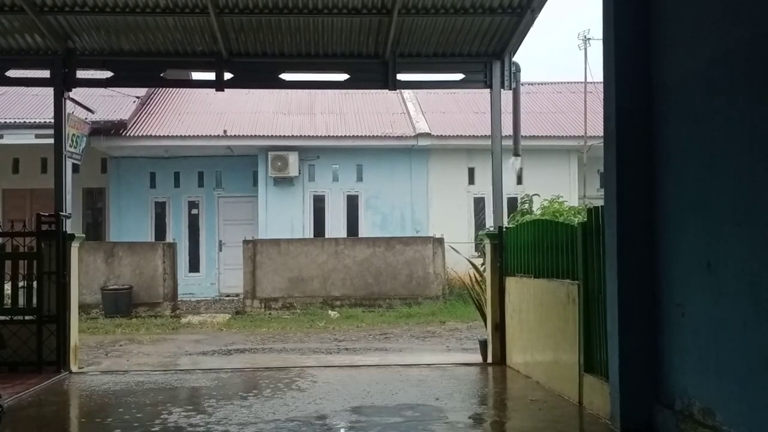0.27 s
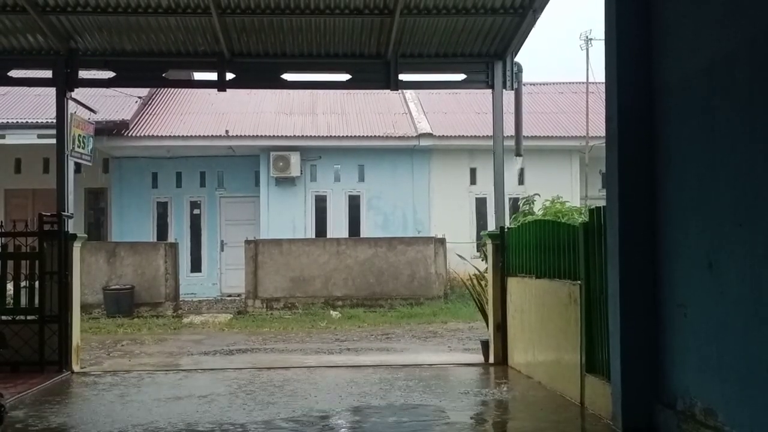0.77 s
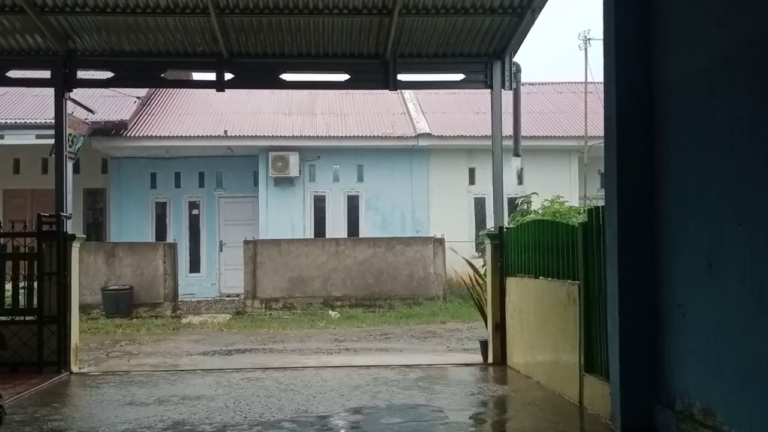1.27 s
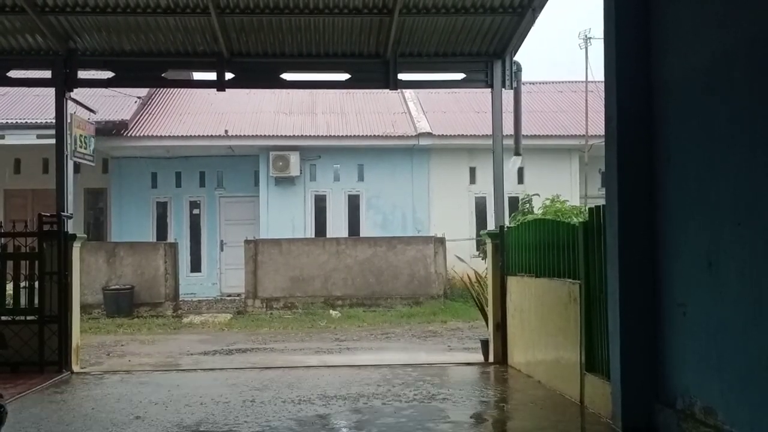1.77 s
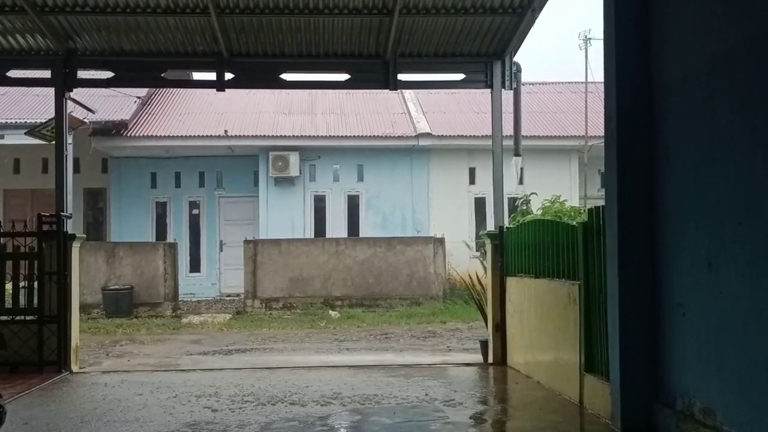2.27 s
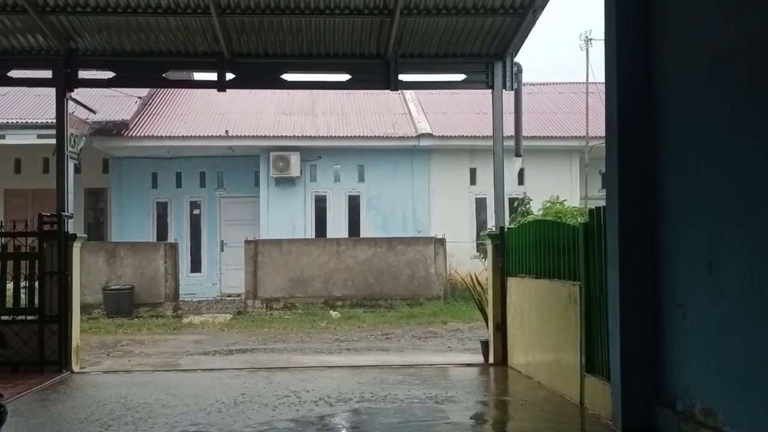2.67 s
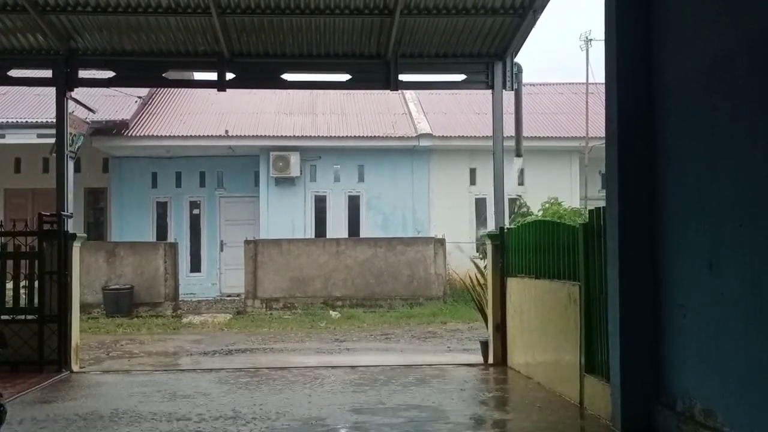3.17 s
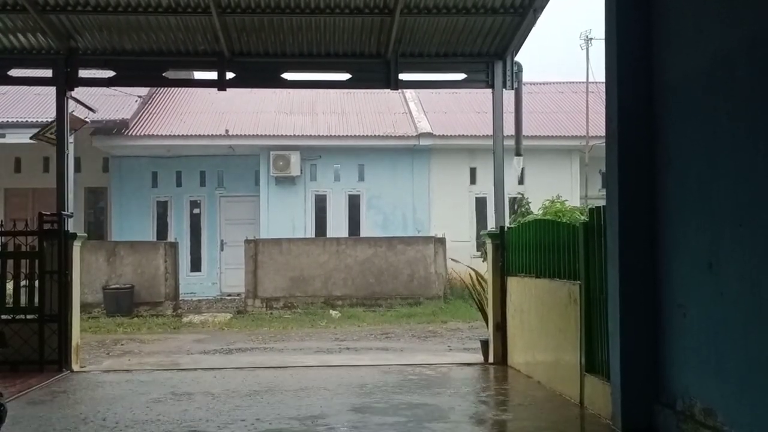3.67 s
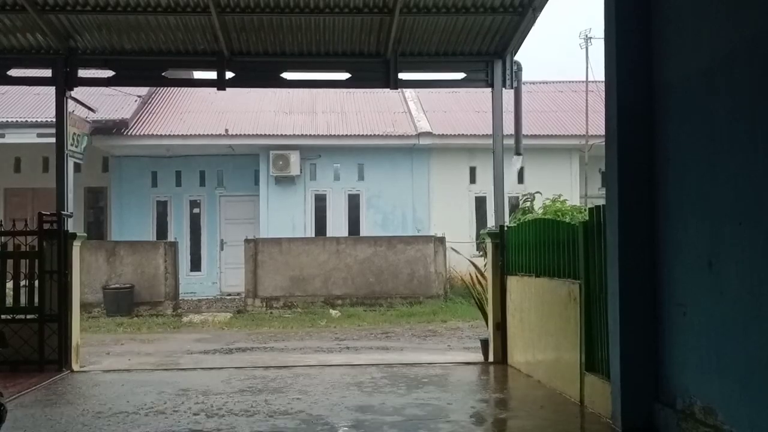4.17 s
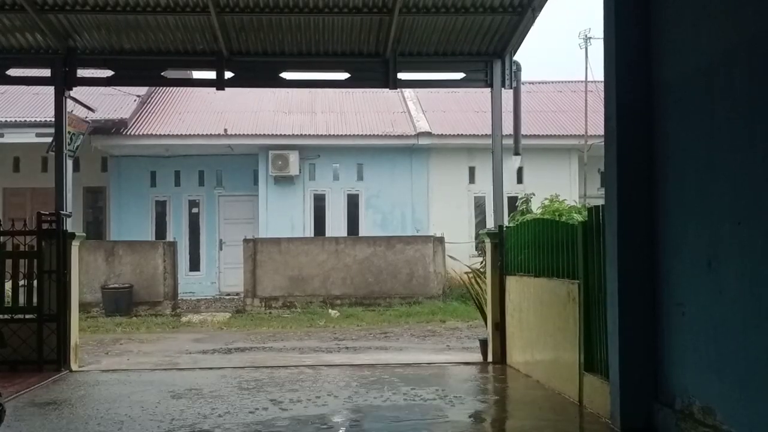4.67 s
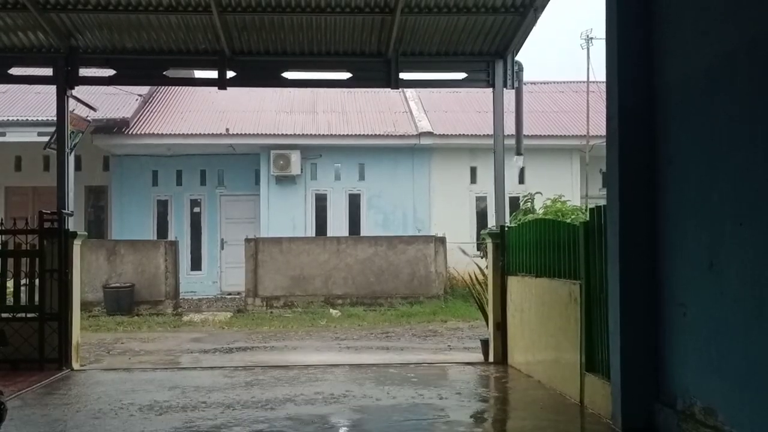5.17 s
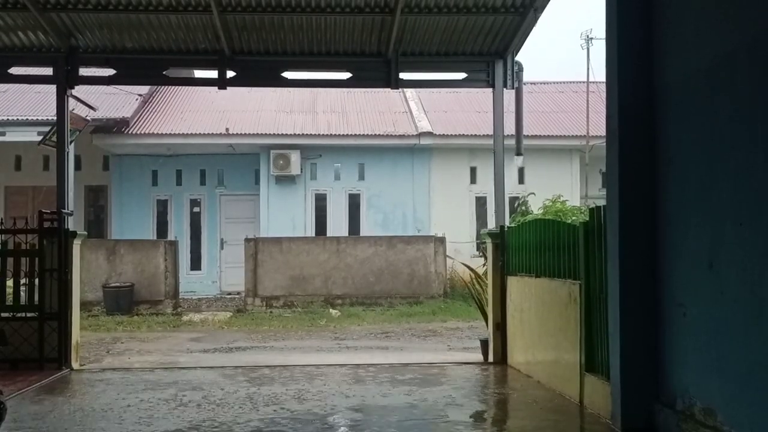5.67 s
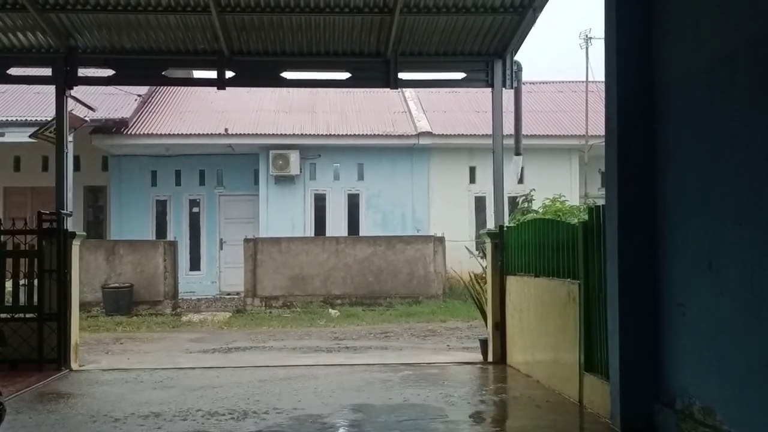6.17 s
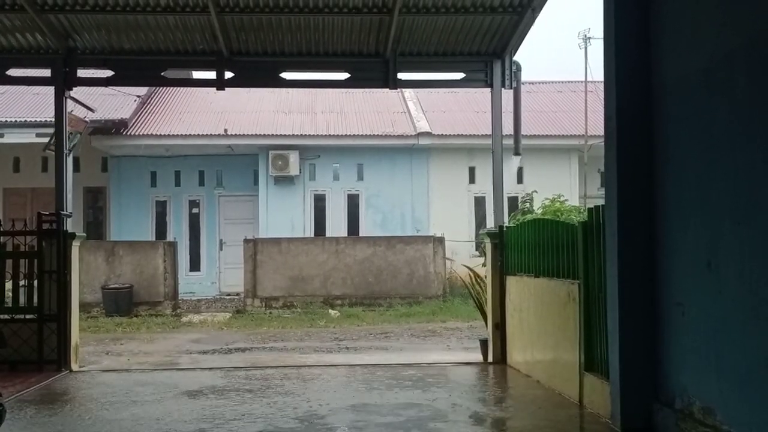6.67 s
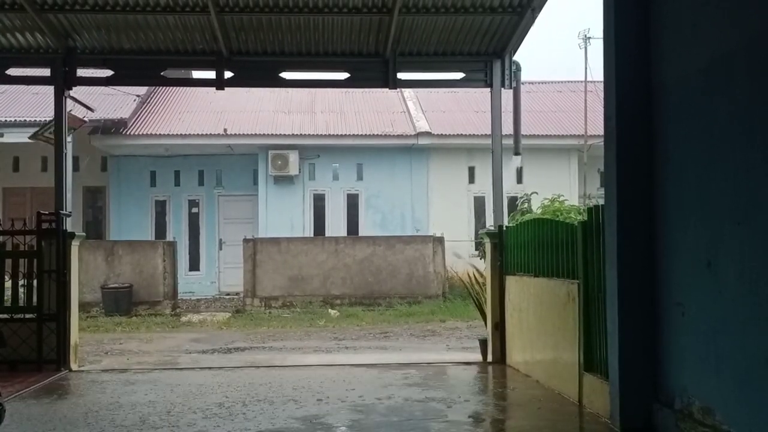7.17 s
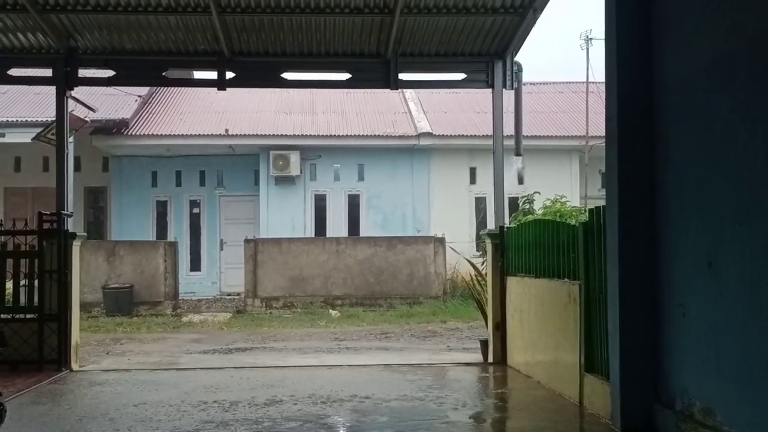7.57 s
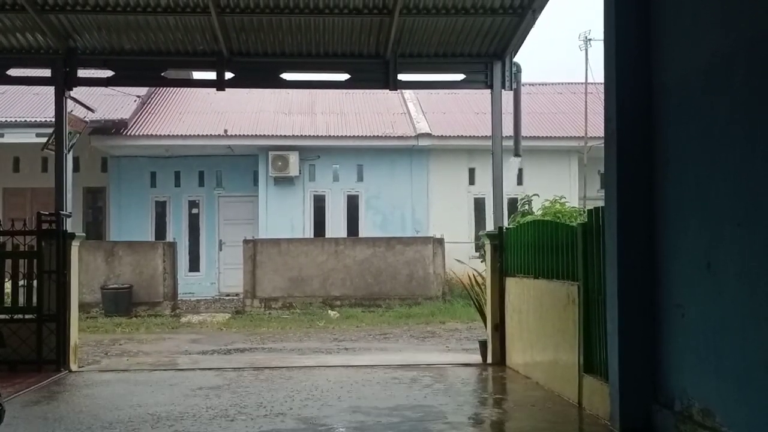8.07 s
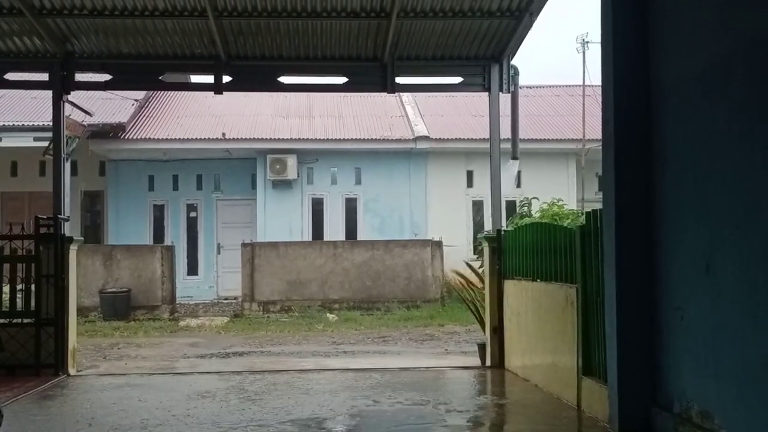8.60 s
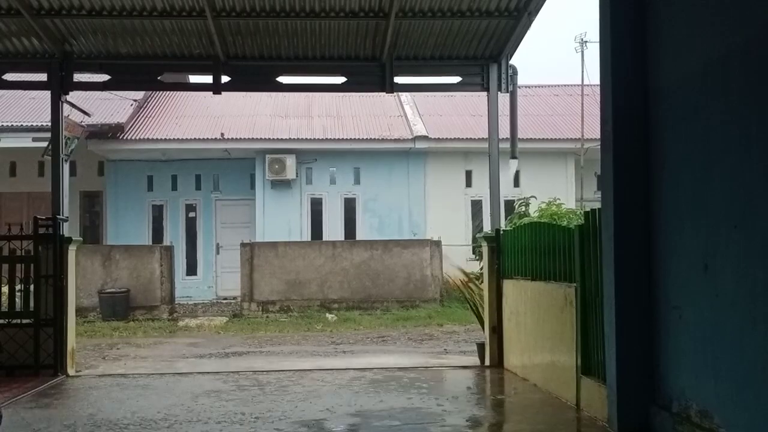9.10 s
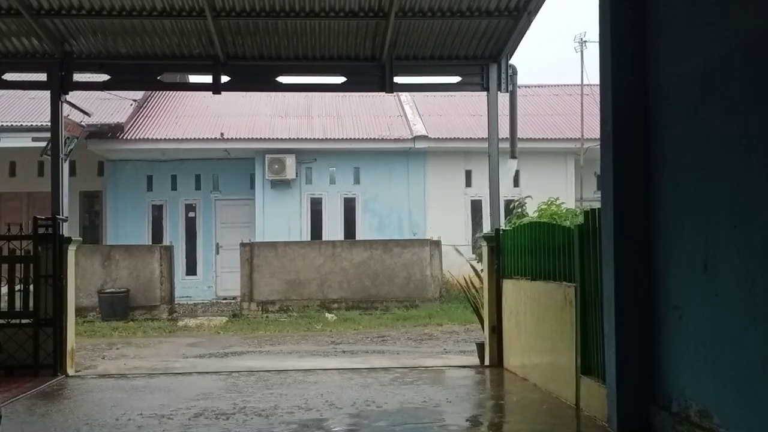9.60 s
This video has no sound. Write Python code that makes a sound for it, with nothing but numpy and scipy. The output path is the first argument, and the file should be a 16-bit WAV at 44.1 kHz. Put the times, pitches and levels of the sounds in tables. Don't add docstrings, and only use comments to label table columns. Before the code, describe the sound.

From beneath a metal canopy, tens of thousands of drops merge into one wide-band rush. Heavy drops boom and drum at first, then the rain turns finer and thinner before filling out at the end. It swells and sags with gusts and never stops. The small microphone sounds nearly mono and resonant around three kilohertz, with crisp splash hiss above.

```python
import sys
import numpy as np
from scipy import signal
from scipy.fft import rfft, irfft, next_fast_len
from scipy.io import wavfile
from scipy.ndimage import uniform_filter1d

SR = 44100
rng = np.random.default_rng(int(sys.argv[2]) if len(sys.argv) > 2 else 0)


def bounce(signal):
    frames = np.transpose(np.atleast_2d(signal))
    limited = np.clip(frames, -1, 1)
    pcm = np.round(limited * 32767).astype(np.int16)
    wavfile.write(sys.argv[1], SR, pcm)


def voltage_ratio(decibels):
    exponent = np.asarray(decibels, float) / 20
    return 10 ** exponent


N = 433944
SECONDS = np.arange(N) / SR
BOOM_TOP_HZ, DRUM_TOP_HZ, SPRAY_FOOT_HZ = 560, 1500, 4900
BLOCK, FIRST_BLOCK, TOP_HZ = 1024, 608, 15750


def rms_one(x):
    return x / np.sqrt(np.mean(x ** 2) + 1e-20)


def in_time(rows):
    s, value = np.transpose(rows)
    return np.interp(SECONDS, s, value)


def drift(rate):
    r = np.exp(-80 * np.pi * rate / SR)
    noise = rng.standard_normal(N // 40 + 2002)
    slow = signal.lfilter([1], [1, -2 * r, r * r], noise)[2000:]
    return np.interp(np.arange(N) / 40, np.arange(len(slow)), rms_one(slow))


def colour(x, points, low_hz, high_hz):
    size = next_fast_len(N)
    hz = np.maximum(np.arange(size // 2 + 1) * SR / size, 1)
    point_hz, point_db = np.transpose(points)
    fade = 1 / np.sqrt((1 + (low_hz / hz) ** 12) * (1 + (hz / high_hz) ** 12))
    gain = voltage_ratio(np.interp(np.log(hz), np.log(point_hz), point_db)) * fade
    return rms_one(irfft(rfft(x, size) * gain, size)[:N])


# time in seconds, strength of the patter in dB.
GUST_STRENGTH = [(0, -21.5), (.43, -23), (.58, -19), (.8, -19.5), (1.05, -22.5), (1.65, -20), (2.78, -23),
                 (3.0, -20), (3.45, -19), (4.2, -22.5), (4.4, -20.5), (4.9, -22.5), (5.13, -24.5),
                 (5.72, -16.5), (6.85, -22), (8.65, -24), (9.5, -22), (9.84, -22)]
# centre in seconds, rise in dB.
WIND_PUFFS = [
    (1.22, 0),
    (3.33, 0.5),
    (4.78, 1),
    (6.47, 0.5),
    (7.2, 0.6),
    (8.15, 1.8),
    (8.92, 2),
]


def gusts():
    half_length_s = 0.15
    level_db = in_time(GUST_STRENGTH)
    for s, rise_db in WIND_PUFFS:
        level_db = level_db + rise_db * np.exp(-((SECONDS - s) / half_length_s) ** 2)
    return level_db


# time in seconds, weight in dB.
DROP_WEIGHT = [
    (0, 3),
    (1.3, 1.5),
    (2.6, 0.5),
    (4, .4),
    (5.2, .8),
    (6.4, -0.8),
    (8.2, -2),
    (9.1, -0.4),
    (9.84, 1.6),
]


def drop_weight():
    return in_time(DROP_WEIGHT)


def drops(per_s, spread_db, clump_db):
    sizes = voltage_ratio(spread_db * np.minimum(rng.exponential(1, N), 5)) * rng.choice([-1, 1], N)
    land = rng.random(N) < per_s / SR
    clumps = voltage_ratio(clump_db * (drift(22) + 0.42 * drift(40)))
    return rms_one(sizes * land * clumps)


def distant_rain():
    return rng.standard_normal(N)


# pitch in Hz, dB per Hz.
BOOM_SPECTRUM = [(15, -45), (25, -33), (42, -23), (62, -16), (79, -30), (90, -4.5), (102, -4.5), (116, -13),
                 (130, -4.5), (160, -6), (205, -1), (300, -1), (480, -2.5), (700, 5)]


def sheet_boom(gust_db, weight_db):
    level_db = -17 + 0.66 * gust_db + 0.77 * weight_db
    return colour(distant_rain(), BOOM_SPECTRUM, 1, BOOM_TOP_HZ) * voltage_ratio(level_db)


# pitch in Hz, dB per Hz.
METAL_SPECTRUM = [(450, -8.5), (650, -7.5), (850, -4.5), (1100, -6), (1500, -7.5), (2000, -3.5), (2500, -2),
                  (3000, 0.5), (3350, 0.5), (3650, -2.5), (3950, -7.5), (4300, -13.5), (4700, -18.5),
                  (5200, -30)]


def drumming(roofs, gust_db, weight_db):
    level_db = -10.5 + 0.85 * gust_db + 0.48 * weight_db
    return colour(roofs, METAL_SPECTRUM, BOOM_TOP_HZ, DRUM_TOP_HZ) * voltage_ratio(level_db)


def patter(roofs, gust_db):
    return colour(roofs, METAL_SPECTRUM, DRUM_TOP_HZ, SPRAY_FOOT_HZ) * voltage_ratio(gust_db)


# pitch in Hz, dB per Hz.
SPRAY_SPECTRUM = [(4300, -8), (4900, -5.5), (5500, -4), (6100, -0.5), (6700, 0.5), (7300, -3), (8300, -8),
                  (9400, -8.5), (10700, -6.5), (11600, -9), (12500, -10), (13800, -14), (14800, -17.5),
                  (15700, -21)]


def spray(near, gust_db, weight_db):
    level_db = -12 + 1.25 * gust_db - 0.4 * weight_db + 0.2 * drift(35)
    return colour(near + distant_rain(), SPRAY_SPECTRUM, SPRAY_FOOT_HZ, SR) * voltage_ratio(level_db)


def scene():
    level_db, weight_db = gusts(), drop_weight()
    mean_db = level_db.mean()
    gust_db = level_db - mean_db
    near = drops(14000, spread_db=2.0, clump_db=0.23)
    roofs = near + voltage_ratio(1.5) * distant_rain()
    rain = sheet_boom(gust_db, weight_db) + drumming(roofs, gust_db, weight_db)
    rain = rain + patter(roofs, gust_db) + spray(near, gust_db, weight_db)
    rain = voltage_ratio(mean_db - 0.16) * rain
    return np.stack([rain, rain])


# time in seconds, loss in dB.
DULL_MOMENTS = [(.083, -9), (.269, -11), (1.105, -9), (1.360, -16), (1.917, -9), (2.289, -25), (3.450, -11),
                (4.750, -16), (7.676, -18), (7.908, -9), (8.280, -30), (8.675, -12), (9.557, -9)]


def dulled_top(x):
    loss = np.zeros(N)
    for s, db in DULL_MOMENTS:
        blocks_away = np.clip((SECONDS - s) * SR / BLOCK, -1, 1)
        loss += (1 - voltage_ratio(db)) * np.cos(np.pi / 2 * blocks_away) ** 2
    hz = np.arange(N // 2 + 1) * SR / N
    top = irfft(rfft(x) * (hz > 15100), N)
    return x - loss * top


def flecks():
    flecks_per_s, second_share, wide_share = 4.6, 0.4, 0.15
    band_bins, narrow_bins, narrow_hz = 32, 24, 5600
    per_hz = 2 * BLOCK / SR
    low, top = int(4200 * per_hz), int(TOP_HZ * per_hz)
    rows = []
    for block, draw in enumerate(rng.random((N // BLOCK - 2, 6))):
        if draw[0] >= flecks_per_s * BLOCK / SR:
            continue
        runs = 2 if draw[1] < second_share else 1
        for place, wide in [draw[2:4], draw[4:6]][:runs]:
            reach = int(place ** 1.3 * (top - low - band_bins))
            first = low + reach // band_bins * band_bins
            bins = narrow_bins if first < narrow_hz * per_hz else band_bins
            bands = 3 if wide < wide_share else 2
            rows.append((FIRST_BLOCK + BLOCK * block, first, min(top, first + bins * bands)))
    return rows


def stereo_flecks(x, side_db):
    side, n = np.zeros(N), np.arange(2 * BLOCK)
    window = signal.windows.kaiser_bessel_derived(2 * BLOCK, 4 * np.pi)
    for at, low, high in flecks():
        k = np.arange(low, high)
        cosines = window * np.cos(np.pi / BLOCK * np.outer(k + 0.5, n + 0.5 + BLOCK / 2))
        strength = uniform_filter1d(np.abs(cosines @ x[at:at + 2 * BLOCK]), size=32)
        weights = strength * rng.standard_normal(len(k))
        side[at:at + 2 * BLOCK] += voltage_ratio(side_db) * 2 / BLOCK * weights @ cosines
    return side


def low_pass(x):
    return signal.sosfilt(signal.butter(12, 15750, fs=SR, output="sos"), x)


def record(dry):
    side = stereo_flecks(dry[0], side_db=-0.7)
    middle = dulled_top(dry[0])
    mix = np.stack([middle + side, middle - side])
    return low_pass(mix)


dry = scene()
out = record(dry)
bounce(out)
```